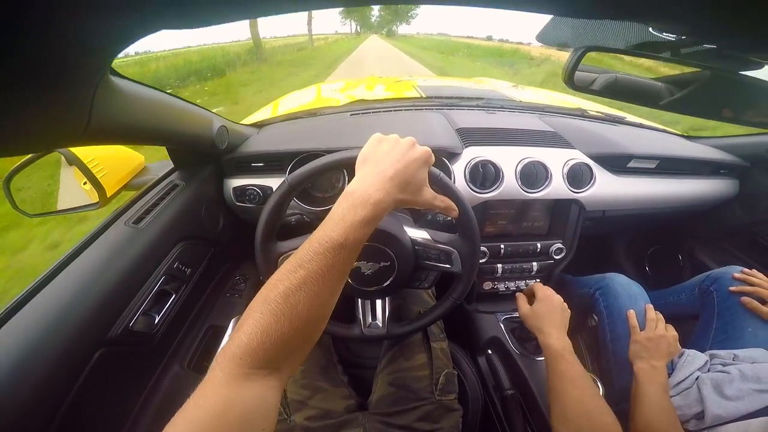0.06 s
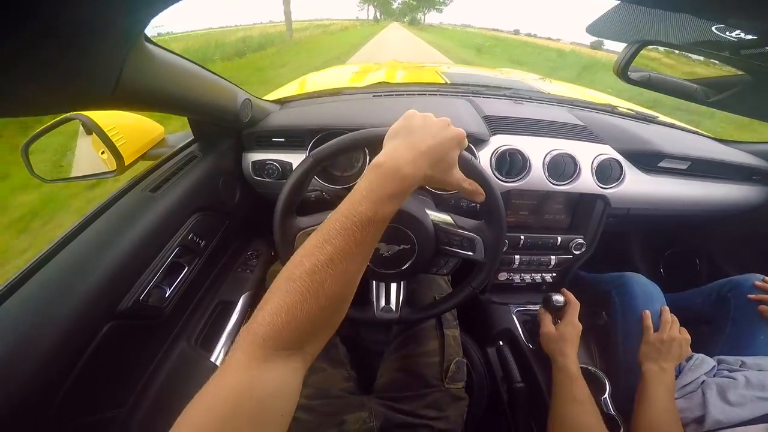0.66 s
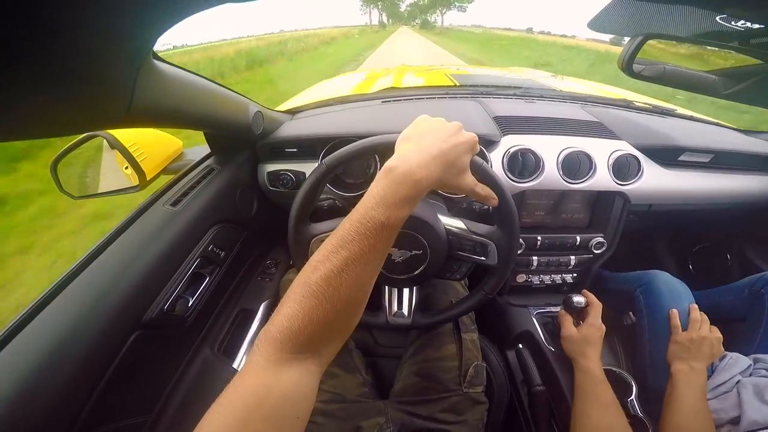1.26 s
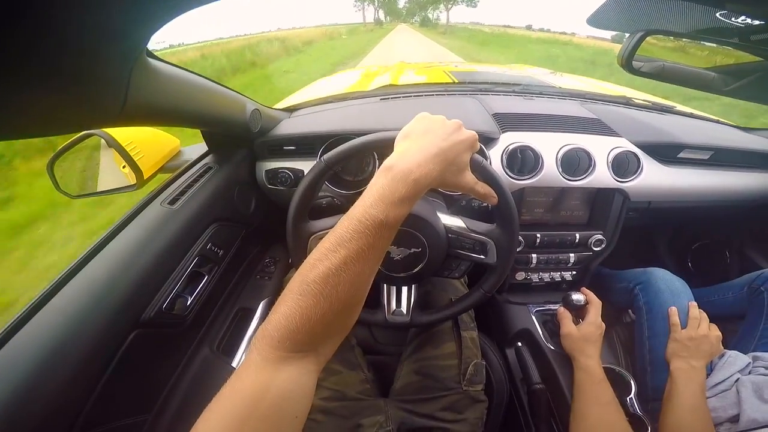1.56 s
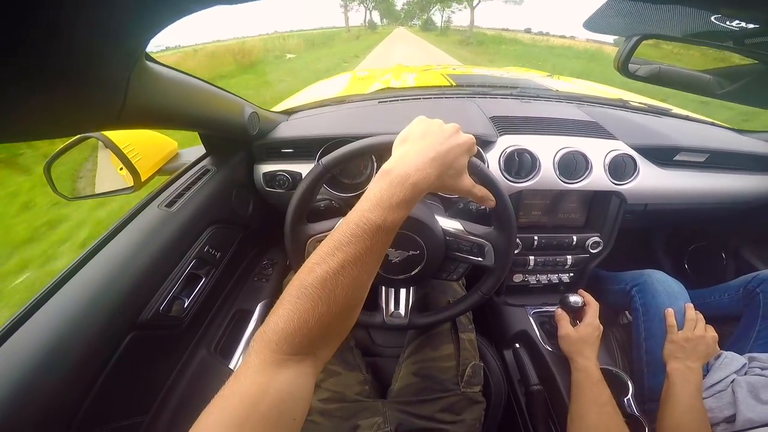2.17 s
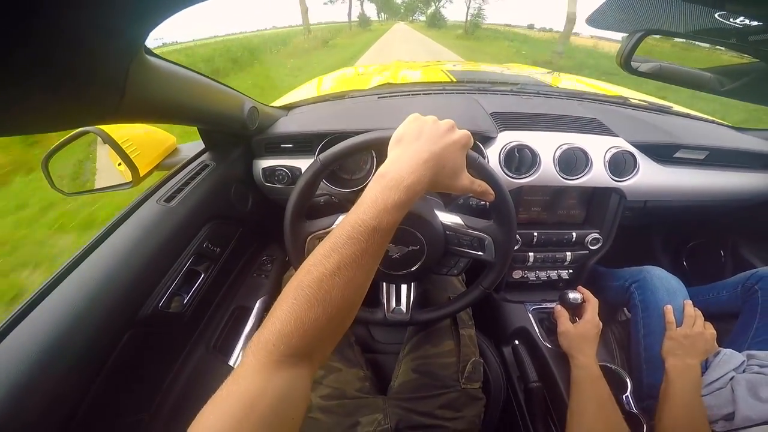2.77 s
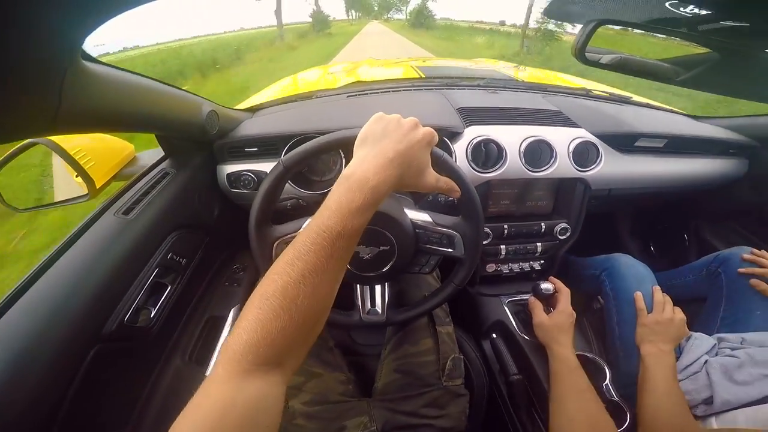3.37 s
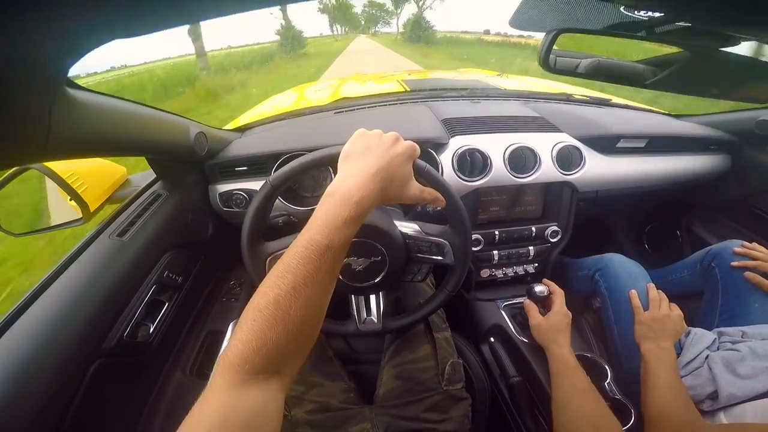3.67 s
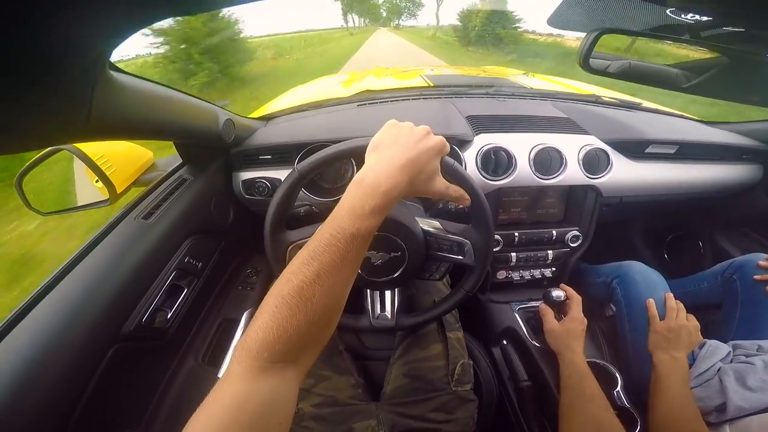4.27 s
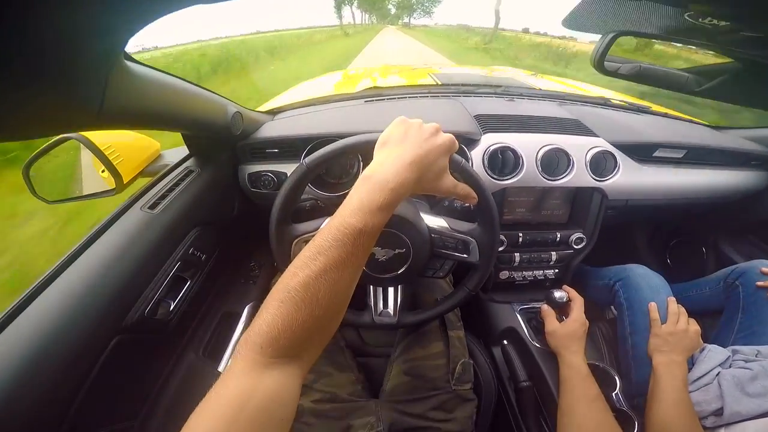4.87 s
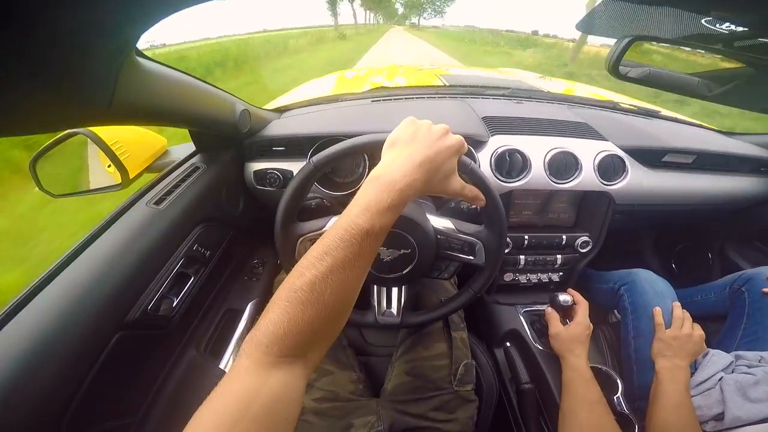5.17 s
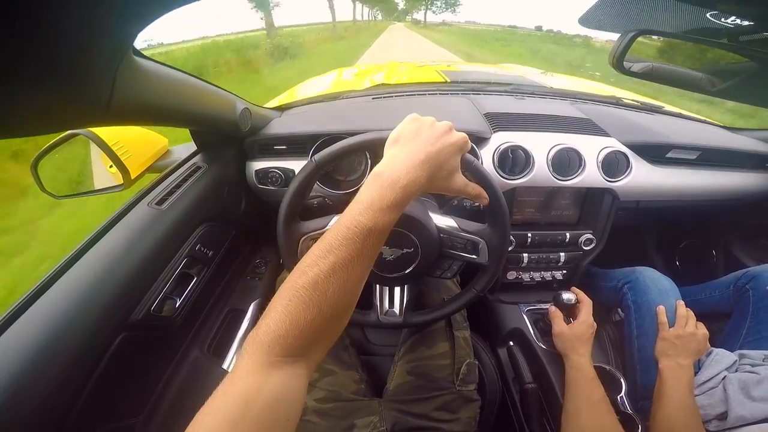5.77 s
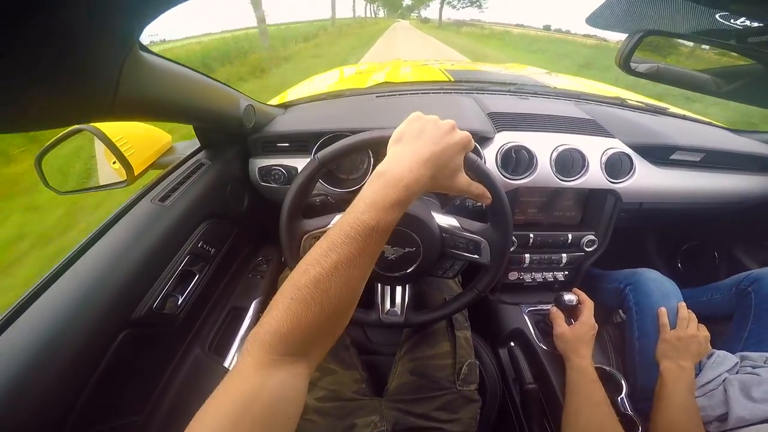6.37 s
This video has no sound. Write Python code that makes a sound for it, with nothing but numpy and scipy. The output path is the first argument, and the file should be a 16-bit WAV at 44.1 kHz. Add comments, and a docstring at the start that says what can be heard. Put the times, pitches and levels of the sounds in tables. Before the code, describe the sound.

Inside a car on a narrow country road, a deep, throbbing rumble and tyre roar run throughout. Under them a low engine hum slowly climbs in pitch. Bumps bring dull thuds through the floor, heavier near the end, with a few soft suspension knocks. Faint grit ticks come and go underneath. The microphone sits behind the driver and adds a very faint, thin electronic whine.

```python
"""Road rumble inside a four-cylinder car that slowly gathers speed on a narrow country road.
The body heaves over bumps, the floor drums and thuds, the suspension knocks and the tyres roar.
The engine's orders swell as they climb through the resonances of exhaust and cabin.
Small ticks, probably grit against the underside, come and go, and faint sizzles join late on.
A camera behind the driver adds a thin electronic whine of its own."""
import sys
import numpy as np
from scipy import signal
from scipy.fft import rfft, irfft, next_fast_len
from scipy.io import wavfile
from scipy.ndimage import uniform_filter1d, map_coordinates

SR = 44100
rng = np.random.default_rng(int(sys.argv[2]) if len(sys.argv) > 2 else 0)


def pcm_store(signal):
    """Save signal as 16-bit PCM."""
    levels = np.round(np.clip(np.atleast_2d(signal), -1, 1) * 32767)
    wavfile.write(sys.argv[1], SR, levels.astype(np.int16).T)


N = 291501
TIME_S = np.arange(N) / SR


def amp(db):
    """Decibels to gain."""
    return 10 ** (np.asarray(db) / 20)


def unit_rms(x):
    """Scale to rms 1."""
    return x / np.sqrt(np.mean(x ** 2) + 1e-20)


def eq_db(colour, hz):
    """Read a (freq_hz, gain_db) curve on a log frequency axis."""
    freq_hz, gain_db = np.transpose(colour)
    return np.interp(np.log(hz + 1e-3), np.log(freq_hz), gain_db)


def resonance_db(resonances, hz):
    """Summed lift or cut of (centre_hz, width_hz, gain_db) bells."""
    return sum(db / (1 + (2 * (hz - centre) / width) ** 2) for centre, width, db in resonances)


def automation(rows):
    """One value per sample for each column after the time."""
    times, *columns = np.transpose(rows)
    return [np.interp(TIME_S, times, column) for column in columns]


def swell(centre_s, width_s):
    """A bell-shaped envelope, down to 1/e at width_s either side."""
    return np.exp(-((TIME_S - centre_s) / width_s) ** 2)


def wobble(rate_hz):
    """A smooth random curve with rate_hz knots a second."""
    knots = rng.standard_normal(int(N * rate_hz / SR) + 4)
    return map_coordinates(knots, [TIME_S * rate_hz])


def filtered(x, response):
    """Shape x with a gain that depends on frequency."""
    size = next_fast_len(N + SR // 2)
    return irfft(rfft(x, size) * response(np.fft.rfftfreq(size, 1 / SR)), size)[:N]


def noise(colour, resonances=()):
    """Noise of rms 1 with a broad colour and narrow resonant peaks."""
    white = rng.standard_normal(N)
    return unit_rms(filtered(white, lambda hz: amp(eq_db(colour, hz) + resonance_db(resonances, hz))))


def levelled(x, samples):
    """Ride the gain to hold x near rms 1 over stretches of this length."""
    power = uniform_filter1d(uniform_filter1d(x ** 2, samples), samples)
    return x / np.sqrt(np.abs(power) + 1e-9)


# Fader ride of the body's rumble: time_s, level_db
RUMBLE_RIDE = [(0, -36), (1.0, -31), (1.8, -36.5), (2.7, -32.5), (3.7, -34.5), (4.6, -33), (5.6, -31),
               (6.6, -31.5)]
# Sub-heavy colour of the rumble: freq_hz, gain_db
RUMBLE_COLOUR = [(4, -42), (8, -6.5), (12, -19), (19, -6.5), (23, -5), (30, 7), (41, -7), (55, -7.5),
                 (80, -35.5), (200, -94)]


def body_rumble(load_db):
    """The body rumbles between bumps, throbbing with the load on the tyres."""
    level_db, = automation(RUMBLE_RIDE)
    return amp(level_db + load_db) * levelled(noise(RUMBLE_COLOUR), samples=3000)


# Fader rides that follow the road surface: time_s, drum_db, tread_db
SURFACE_RIDE = [(0.0, -39, -59.5), (0.8, -41.5, -59.5), (1.5, -40.5, -60), (2.4, -41.5, -58.5),
                (3.6, -43, -57.5), (4.2, -42.5, -58.5), (5.3, -39.5, -58), (6.0, -40.5, -58),
                (6.6, -40, -57)]
# Boomy colour of the floor's drumming: freq_hz, gain_db
DRUM_COLOUR = [(25, -41), (45, 0.5), (60, 0.5), (80, 0.5), (100, -1.5), (130, -7), (160, -13), (185, -13.5),
               (250, -24), (330, -23), (500, -42), (1500, -61)]
# Midrange colour of the tread's roar: freq_hz, gain_db
TREAD_COLOUR = [(100, -31), (250, -0.5), (350, 0.5), (480, -1), (680, -3.5), (780, -7), (1000, -8),
                (1200, -11), (1700, -15), (2700, -20.5), (3500, -29.5), (8000, -38)]
# Tyre cavity and cabin panel resonances: centre_hz, width_hz, gain_db
CABIN_RESONANCES = [(213.5, 13.4, 10.5), (204.5, 13, 1), (271.5, 34, 3.5), (430, 12, 4.5), (475, 50, -0.5),
                    (597, 13, 5), (880, 50, 1.5), (917, 160, 3.5)]


def tyres(patches_db, throb_db, tread_trim_db):
    """Coarse asphalt drums on the floor and the tread roars, both through the cabin's resonances."""
    drum_db, tread_db = automation(SURFACE_RIDE)
    drum = levelled(noise(DRUM_COLOUR, CABIN_RESONANCES), samples=6000)
    tread = noise(TREAD_COLOUR, CABIN_RESONANCES)
    return amp(patches_db) * (amp(drum_db + throb_db) * drum + amp(tread_db + tread_trim_db) * tread)


# Brief dips in the rumble: centre_s, dip_db
RUMBLE_DIPS = [(0.39, -8), (1.76, -1), (2.2, -2), (2.86, -2), (3.51, -7), (3.7, -4), (3.8, -8), (4.04, -3),
               (4.22, -1), (4.96, -11), (5.46, -2.5), (6.03, -4), (6.34, -1)]


def road(patchy_db, uneven_db):
    """Rough patches lift the tyre noise; the changing tyre load makes rumble and drumming throb."""
    patches_db = patchy_db * wobble(rate_hz=14)
    dips_db = sum(db * swell(centre_s, width_s=0.02) for centre_s, db in RUMBLE_DIPS)
    load_db = uneven_db * wobble(rate_hz=22) + dips_db
    return body_rumble(load_db) + tyres(patches_db, throb_db=0.44 * load_db, tread_trim_db=-1)


# The crankshaft's slow climb: time_s, speed_hz
CRANK_SPEED = [(0.0, 36.46), (1.0, 39.42), (2.0, 42.02), (3.0, 44.17), (4.0, 45.95), (5.0, 47.35),
               (6.0, 48.72), (6.61, 49.56)]
# Main engine orders, between resonances: crank_multiple, level_db
MAIN_ORDERS = [(2, -48), (3, -59), (3.5, -54), (4, -58.5), (4.5, -65), (5, -77), (6, -68.5), (6.5, -71.5),
               (7, -71), (8, -69.5), (9.5, -75), (10, -75.5), (10.5, -78), (11.5, -76), (12, -77.5),
               (12.5, -79.5), (13, -75.5), (13.5, -80), (14, -79.5), (15, -81)]
# Standing waves in exhaust and cabin that lift or swallow an order: centre_hz, width_hz, gain_db
STANDING_WAVES = [(76, 5.5, 8), (130, 8, 4), (157, 16, 4.5), (179, 19, -9), (225, 18, 9.5), (260, 24, -7),
                  (285, 17.4, 11), (298, 8.5, -4), (315.6, 15, 5.5), (344, 24, 6), (390, 35, -9),
                  (435, 22, 9.5), (590, 28, 10)]
# High orders that sing as they cross a panel resonance: crank_multiple, centre_hz, width_hz, peak_db
PANEL_ORDERS = [(21, 950, 40, -78), (29, 1297, 50, -79.5), (40, 1630, 70, -81)]


def engine(waver_db, waver_hz, jitter_turns):
    """Crank half orders glide through resonances; uneven combustion shakes their phase and level."""
    speed_hz, = automation(CRANK_SPEED)
    turns = np.cumsum(speed_hz) / SR + jitter_turns * wobble(rate_hz=25)
    main_db = {round(2 * order) / 2: db for order, db in MAIN_ORDERS}
    partials = []
    for order in np.arange(2, 16, 0.5):
        level_db = main_db.get(order, -49 - 9 * np.log2(order))  # the rest fall 9 dB an octave
        partials.append((order, amp(level_db + resonance_db(STANDING_WAVES, order * speed_hz))))
    for order, centre_hz, width_hz, peak_db in PANEL_ORDERS:
        off_centre = 2 * (order * speed_hz - centre_hz) / width_hz
        partials.append((order, amp(peak_db) / (1 + off_centre ** 2)))
    hum = np.zeros(N)
    for order, gain in partials:
        waver = unit_rms(amp(waver_db * wobble(waver_hz)))
        hum += gain * waver * np.sqrt(2) * np.sin(2 * np.pi * (order * turns + rng.random()))
    return hum


# The camera's two thin tones: pitch_hz, level_db
WHINE_TONES = [(6308.7, -67.5), (12617.4, -66)]
# Bright colour of its hiss: freq_hz, gain_db
HISS_COLOUR = [(200, -14), (1500, 2.5), (3500, 1), (5000, 0), (6800, -2), (8000, -6), (9500, -6),
               (11000, -8.5), (13600, -5.5), (15000, -47)]


def camera_whine(frame_hz, pause_share, chirr_hz, chirr_db, hiss_db):
    """Over a steady hiss, electronics whine as each picture is read out and pause between pictures."""
    frames = TIME_S * frame_hz + 0.535
    readout_gate = uniform_filter1d((frames % 1 < 1 - pause_share) * 1.0, size=64)
    whine = np.zeros(N)
    for harmonic, (hz, db) in enumerate(WHINE_TONES, 1):
        restart = np.pi * harmonic * np.floor(frames)  # the lower tone flips each picture and buzzes
        whine += amp(db) * np.sqrt(2) * np.sin(2 * np.pi * hz * TIME_S + restart)
    # a fainter, unsteady chirr sounds early in each picture
    chirr_gate = uniform_filter1d((np.abs(frames % 1 - 0.22) < 0.17) * 1.0, size=100)
    chirr = chirr_gate * np.sin(2 * np.pi * chirr_hz * TIME_S + 1.7 * wobble(rate_hz=50))
    return readout_gate * whine + amp(chirr_db) * chirr + amp(hiss_db) * noise(HISS_COLOUR)


# Colour of a grain's snap on the damped floor: freq_hz, gain_db
SNAP_COLOUR = [(250, -30), (550, -11), (950, 1.5), (1200, -1.5), (1480, -9), (1750, -6.5), (2000, -4),
               (2230, -8), (2700, -3), (3150, -11.5), (3700, -16), (5500, -35)]


def snap(samples, scatter_db=0):
    """One grain hits the floor: a short minimum-phase ring of peak 1, its colour varied by scatter_db."""
    colour = [(hz, db + rng.normal(0, scatter_db)) for hz, db in SNAP_COLOUR] if scatter_db else SNAP_COLOUR
    log_gain = np.log(amp(eq_db(colour, np.fft.rfftfreq(samples, 1 / SR))))
    causal_cepstrum = irfft(log_gain) * (1 + np.sign(np.fft.fftfreq(samples)))
    ring = irfft(np.exp(rfft(causal_cepstrum)))
    return ring / np.abs(ring).max()


def sand(peak_db, grains_per_s):
    """Fine grains patter on the floor at random, all with the same snap."""
    hits = (rng.random(N) < grains_per_s / SR) * rng.uniform(-0.92, 1, N)
    return amp(peak_db) * signal.fftconvolve(hits, snap(samples=1024))[:N]


# Cues for the louder grit ticks: start_s, level_db
GRIT_CUES = [(0.059, -52.5), (0.382, -53), (0.5365, -55), (0.8242, -53.5), (0.8885, -56), (1.1335, -49.5),
             (1.466, -55), (2.3126, -50), (2.394, -49), (2.5558, -53), (2.663, -49.5), (2.9958, -53),
             (3.122, -51.5), (3.235, -53), (3.5825, -47), (3.88, -45), (4.5554, -51), (4.725, -55),
             (4.885, -52), (5.0235, -45.5), (5.435, -52), (5.6398, -47.5), (6.108, -47.5), (6.4425, -50)]


def grit(trim_db, tail_db, tail_t60_s):
    """Each grain is one dry snap, a little different in colour; the cabin adds a faint tail."""
    track = np.zeros(N + SR)
    for start_s, level_db in GRIT_CUES:
        tick = snap(samples=4096, scatter_db=1.5)
        t = np.arange(len(tick)) / SR
        reverb = rng.standard_normal(len(t)) * amp(-60 * t / tail_t60_s)
        tail = signal.fftconvolve(tick, reverb / np.linalg.norm(reverb))[:len(t)]
        track[round(start_s * SR):][:len(t)] += amp(level_db + trim_db) * (tick + amp(tail_db) * tail)
    return track[:N]


# Cues for bumps that rock the body: start_s, level_db
BUMP_CUES = [(0.091, -29), (0.287, -26.5), (0.475, -28), (0.95, -31), (2.068, -28.5), (2.386, -25.5),
             (2.543, -25), (2.737, -28.5), (2.934, -27.5), (3.207, -30), (3.399, -30), (3.564, -28),
             (3.825, -29.5), (4.414, -32.5), (4.835, -25.5), (5.009, -21.5), (5.251, -19), (5.538, -26),
             (6.082, -21.5), (6.374, -29), (6.507, -23)]


def bumps(trim_db, body_hz, detune, rise_s, hold_s, decay_s):
    """Each bump shakes the body on its mounts for a few cycles: it rises quickly, holds and settles."""
    t = np.arange(SR // 2) / SR
    envelope = np.clip(t / rise_s, 0, 1) * np.exp(-np.maximum(t - rise_s - hold_s, 0) / decay_s)
    track = np.zeros(N + SR)
    for start_s, level_db in BUMP_CUES:
        shake = np.sin(2 * np.pi * body_hz * rng.normal(1, detune) * t)
        track[round(start_s * SR):][:len(t)] += amp(level_db + trim_db) * envelope * shake
    return track[:N]


# Cues for sharper edges in the asphalt: start_s, peak_db
THUD_CUES = [(0.304, -29.5), (0.447, -26.5), (0.636, -34), (0.872, -28), (0.925, -28.5), (1.558, -30),
             (3.268, -29), (3.897, -35), (4.302, -31.5), (4.559, -33), (5.0, -29), (5.099, -27),
             (5.253, -31.5), (5.552, -29), (5.685, -30.5), (6.481, -24), (6.559, -28)]
# The floor's low modes: pitch_hz, gain_db, t60_s
FLOOR_MODES = [(68, 1.5, .12), (90, -2, 0.16), (124, -10, 0.12)]


def floor_thuds(attack_s, detune):
    """An edge in the road, softened by the tyre, rings the floor's low modes."""
    t = np.arange(SR // 3) / SR
    track = np.zeros(N + SR)
    for start_s, peak_db in THUD_CUES:
        ring = np.zeros(len(t))
        for hz, gain_db, t60_s in FLOOR_MODES:
            cycles = hz * rng.normal(1, detune) * t + rng.random()
            ring += amp(gain_db - 60 * t / t60_s) * np.sin(2 * np.pi * cycles)
        ring *= 1 - np.exp(-(t / attack_s) ** 2)
        track[round(start_s * SR):][:len(t)] += amp(peak_db) * ring / np.abs(ring).max()
    return track[:N]


# Cues for the suspension's knocks: centre_s, level_db
KNOCK_CUES = [(2.38, -60), (2.673, -61), (5.104, -59), (5.254, -56.5), (5.533, -61), (5.925, -59.5),
              (6.073, -59), (6.347, -62)]
# Their dull, boxy colour: freq_hz, gain_db
KNOCK_COLOUR = [(300, -12), (600, 2), (850, 1), (1050, -7), (1400, -17), (3000, -35)]


def suspension_knocks(trim_db, width_s):
    """Short, dull knocks as a wheel drops and is caught."""
    envelope = sum(amp(db + trim_db) * swell(centre_s, width_s) for centre_s, db in KNOCK_CUES)
    return envelope * noise(KNOCK_COLOUR)


# Cues for faint sizzles late in the drive: centre_s
SIZZLE_CUES = [5.375, 5.495, 5.665, 5.735, 5.9, 6.05, 6.235, 6.29, 6.48]
# Their airy colour: freq_hz, gain_db
SIZZLE_COLOUR = [(3000, -30), (7000, -12), (9400, 10), (10300, -3), (11500, 7), (12800, 12), (15000, -10)]


def sizzles(level_db, width_s, flutter_db):
    """Short, faint swells of high hiss that flutter finely."""
    envelope = sum(swell(centre_s, width_s) for centre_s in SIZZLE_CUES)
    flutter = unit_rms(amp(flutter_db * wobble(rate_hz=140)))
    return amp(level_db) * envelope * flutter * noise(SIZZLE_COLOUR)


def scene():
    """The mono mix behind the driver: steady beds first, then hits and details."""
    mix = road(patchy_db=0.8, uneven_db=2.0)
    mix += engine(waver_db=1.6, waver_hz=9, jitter_turns=0.0006)
    mix += camera_whine(frame_hz=29.97, pause_share=0.051, chirr_hz=5540, chirr_db=-73.5, hiss_db=-67.5)
    mix += sand(peak_db=-55.5, grains_per_s=25)
    mix += grit(trim_db=3.5, tail_db=-7.5, tail_t60_s=0.035)
    mix += bumps(trim_db=1, body_hz=31.67, detune=0.076, rise_s=0.024, hold_s=0.021, decay_s=0.075)
    mix += floor_thuds(attack_s=0.01, detune=0.11)
    mix += suspension_knocks(trim_db=1.5, width_s=0.016)
    mix += sizzles(level_db=-72.5, width_s=0.028, flutter_db=5.0)
    return mix[None]


def record(dry):
    """The camera keeps nothing above its band limit."""
    return filtered(dry[0], lambda hz: hz < 15150)[None]


dry = scene()
out = record(dry)
pcm_store(out)
```